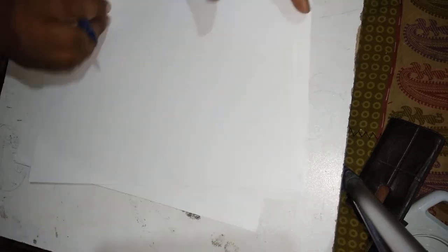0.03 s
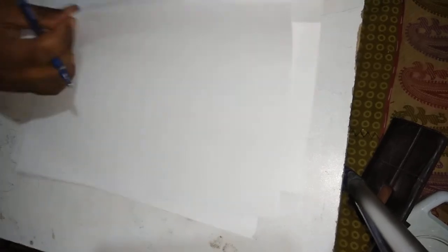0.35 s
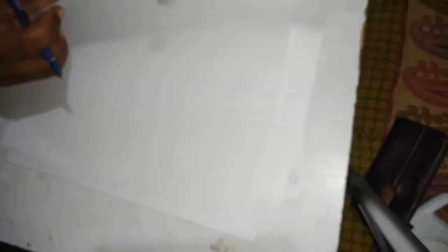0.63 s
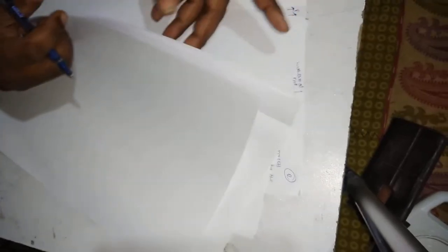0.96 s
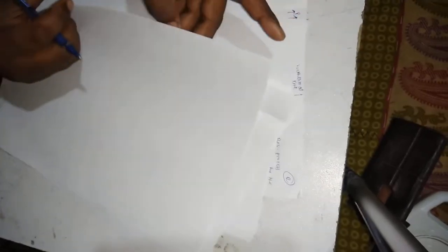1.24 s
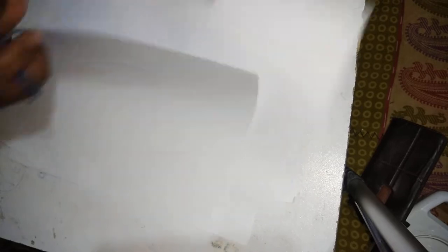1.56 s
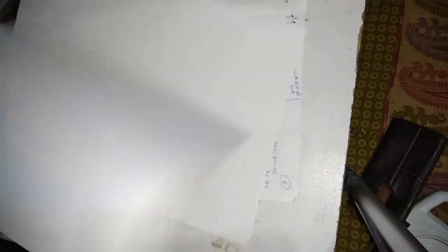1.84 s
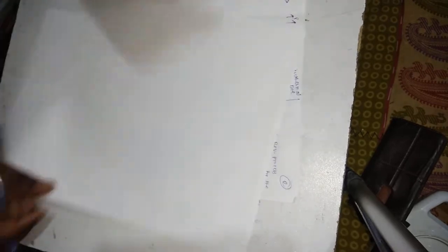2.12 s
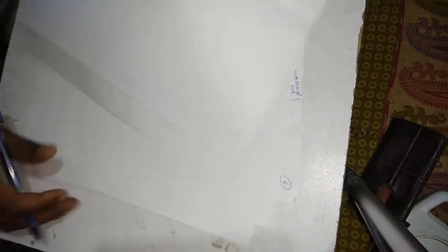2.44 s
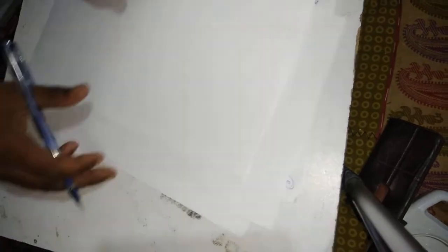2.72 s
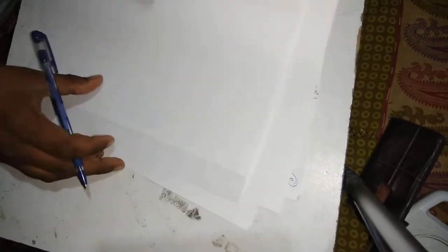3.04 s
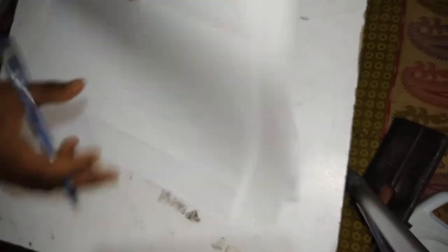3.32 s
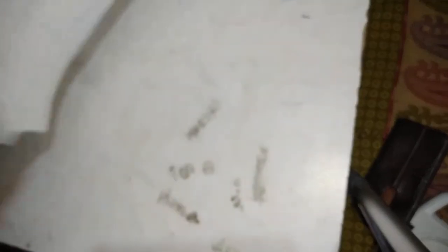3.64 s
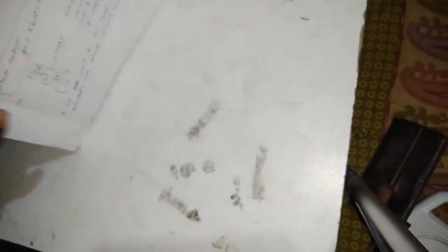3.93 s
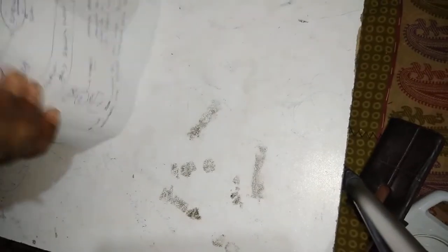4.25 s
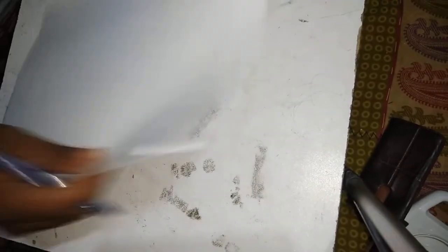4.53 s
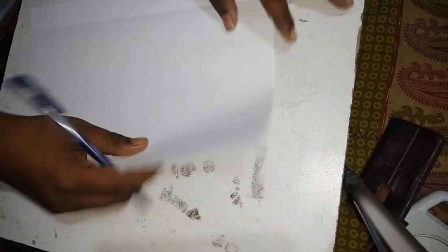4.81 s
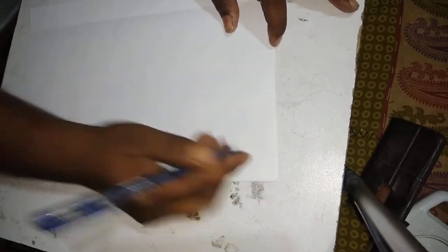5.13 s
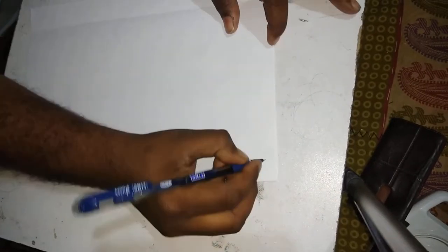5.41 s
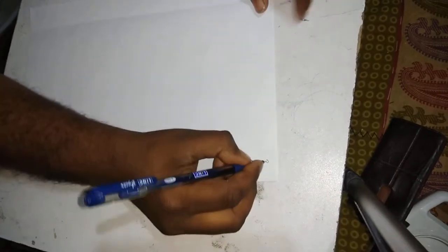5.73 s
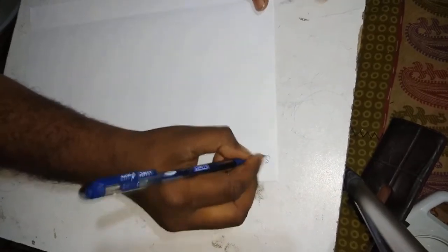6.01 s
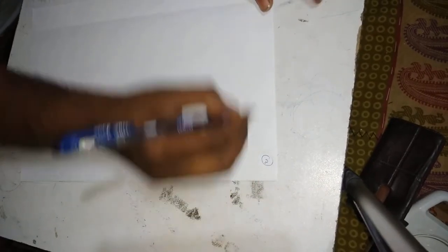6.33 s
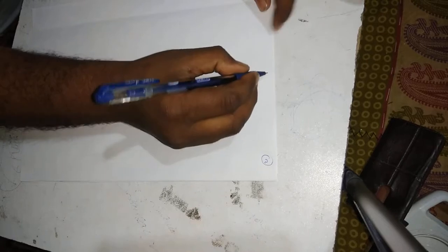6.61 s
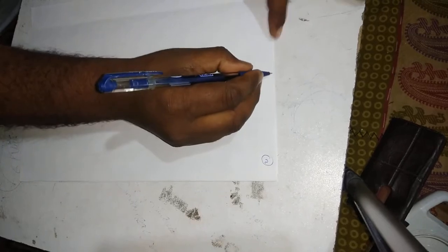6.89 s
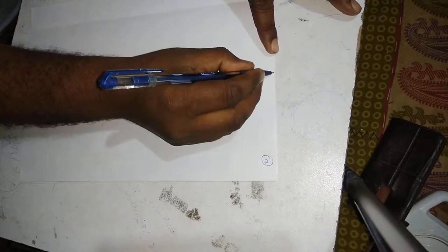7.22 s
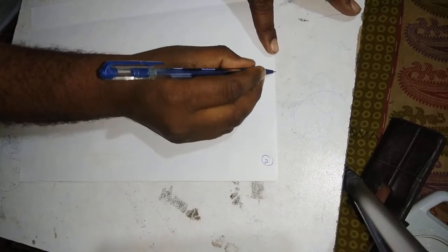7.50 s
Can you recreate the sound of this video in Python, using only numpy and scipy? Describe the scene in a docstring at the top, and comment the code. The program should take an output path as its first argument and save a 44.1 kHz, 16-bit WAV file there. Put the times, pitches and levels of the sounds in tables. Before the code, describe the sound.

Close paper hisses, snaps and slaps as pages are turned; something hard clatters on the desk, then a hand with a pen settles, ticking lightly.

```python
"""Sheets of paper slide, lift and turn over on a desk, close to a phone in a small quiet room.
Fibres catch and let go in a hiss and a lower rustle; sheets snap as they buckle and slap the stack.
Something hard clatters once and rings the desk, then a hand with a pen settles on the page among
light ringing ticks. Faint gliding tones come and go; a thin high whine hangs behind it all and fades."""
import sys
import numpy as np
from scipy import signal
from scipy.fft import rfft, irfft, next_fast_len
from scipy.io import wavfile
from scipy.ndimage import uniform_filter1d

SR = 44100
rng = np.random.default_rng(int(sys.argv[2]) if len(sys.argv) > 2 else 0)


def generate_wav(signal):
    """Clip the signal to [-1, 1] and save it as 16-bit WAV at the path in sys.argv[1]."""
    frames = np.transpose(np.atleast_2d(signal))
    scaled = np.clip(frames, -1, 1) * 32767
    pcm = np.round(scaled).astype(np.int16)
    wavfile.write(sys.argv[1], SR, pcm)


N = 342204
TIME = np.arange(N) / SR

# room tone: freq_hz, gain_db
AIR_EQ = [(30, -30.5), (100, -15.5), (200, -3), (420, 2.5), (700, -13), (1200, -8.5), (2500, -31),
          (15000, -41)]
# partials of the whine: pitch_hz, half_width_hz, level_db, fade_share
WHINE_TONES = [(3350, 14, -64, 0.51), (7744, 31, -53, 0.76), (11120, 26, -61.5, 1),
               (11320, 45, -63.5, 0.96), (12635, 24, -57.5, 0.96)]
# the whine dying away: time_s, gain_db
WHINE_FADE = [(0, 5), (.8, 1), (1.6, 1), (2.4, -5), (3.4, -11), (4.4, -9), (5.1, -13), (5.5, -15),
              (6.9, -14.5), (7.25, -23), (7.5, -41), (7.76, -43)]

# a sheet is pushed or lifted: start_s, length_s, hiss_db, sheen_offset_db, rustle_db
STROKES = [(0.104, 0.064, -47.5, 0.5, -56.5), (0.167, 0.15, -53, -6, -59.5), (0.344, 0.056, -45.5, -8, -62),
           (0.44, 0.22, -46.5, -4.5, -51), (0.551, 0.21, -48, 1, -45.5), (1.059, 0.081, -52.5, -5.5, -72),
           (1.24, 0.2, -49.5, -8.5, -55), (1.422, 0.078, -37.5, -2, -51.5), (1.525, 0.11, -47.5, 3, -47.5),
           (1.657, 0.16, -44, -4.5, -49), (1.78, 0.095, -40.5, -7.5, -42), (1.96, .28, -55, -3, -53.5),
           (2.269, 0.084, -39.5, -1.5, -39.5), (2.448, 0.31, -51, 0.5, -49.5),
           (2.606, 0.054, -45.5, 1.5, -68), (2.863, .06, -43, -5, -44.5), (2.942, 0.12, -42, -17.5, -37.5),
           (3.183, .14, -40, -13, -45), (3.423, 0.15, -49, -3, -48.5), (3.618, .035, -47, 7, -43),
           (3.722, 0.1, -49.5, 3, -61), (4.178, 0.064, -46.5, 3.5, -48.5), (4.25, 0.12, -50, 4, -54.5),
           (4.592, 0.052, -47.5, -7, -44), (4.67, 0.17, -63, -13, -53), (4.847, 0.027, -46, -2, -60),
           (5.147, 0.052, -67, 6, -86), (5.519, 0.078, -69, 6, -67), (5.619, 0.23, -59, 1, -56),
           (6.23, 0.048, -61, 2, -57.5), (6.06, 0.041, -83, 11, -82), (6.448, .08, -82.5, 13, -80),
           (6.648, 0.034, -73, 9, -72), (7.453, 0.028, -94.5, -2, -65), (7.635, 0.18, -63.5, -2, -65)]
# held sheets creep between strokes until they lie flat under the hand: time_s, level_db
CREEP = [(0, -58), (1.0, -61), (2.0, -58.5), (3.2, -50), (4.3, -57), (4.95, -61), (5.3, -89), (6.6, -88.5),
         (7.76, -95)]
# sliding hiss, its fine sheen and the rustle of bending: freq_hz, gain_db
HISS_EQ = [(700, -32), (2000, -0.5), (3800, 2), (5500, 0), (7000, 0), (9000, -10), (12000, -18.5),
           (15500, -30.5)]
SHEEN_EQ = [(3000, -33.5), (6000, -10), (8500, -0.5), (11000, -1.5), (13000, -5), (15500, -8.5)]
RUSTLE_EQ = [(200, -24.5), (500, -3), (900, 5), (1500, 1), (2500, -4.5), (4000, -18), (8000, -39.5)]

# hand and paper rub over the desk top: start_s, length_s, level_db
RUBS = [(0.534, 0.064, -48.5), (1.593, 0.076, -61), (1.814, 0.068, -44), (2.102, 0.013, -51),
        (2.424, 0.42, -53), (2.892, 0.031, -43.5), (3.34, 0.11, -58), (3.467, 0.22, -53.5),
        (4.17, .02, -43.5), (4.21, 0.15, -53), (4.52, 0.028, -52), (4.595, 0.12, -58), (4.78, 0.11, -55),
        (5.016, 0.15, -65), (5.526, 0.065, -61.5), (5.62, 0.25, -58.5), (6.021, 0.12, -57.5),
        (6.3, .06, -54), (6.616, 0.069, -56), (7.45, 0.098, -67.5), (7.636, 0.067, -63.5)]
# rubbing on the desk, and skin on the page: freq_hz, gain_db
RUB_EQ = [(30, -43.5), (70, -29.5), (130, -7), (220, 0), (400, -0.5), (600, -3), (1000, -20), (3000, -48.5)]
PALM_EQ = [(30, -30), (70, -39), (130, -1), (200, -1), (330, 1), (500, -6), (700, -23.5), (3000, -44)]
# the side of the hand takes over the rubbing: time_s, palm_share
PALM_CROSSFADE = [(4.5, 0.0048), (5.0, 1)]

# faint gliding tones: start_s, length_s, start_hz, end_hz, level_db, width_share
GLIDES = [(0.127, 0.23, 726, 604, -72, 0.14), (0.137, 0.36, 390, 337, -66.5, 0.15),
          (2.503, 0.35, 500, 412, -53, 0.34), (5.629, 0.14, 700, 559, -60.5, .5),
          (5.963, 0.035, 1593, 1655, -56.5, 0.14), (6.068, 0.17, 1190, 1060, -68.5, .4),
          (6.558, .056, 1755, 1655, -60.5, .25), (6.88, .22, 1150, 997, -74.5, 0.25),
          (7.042, .17, 464, 424.4, -66, 0.18), (7.029, 0.39, 4650, 4430, -86.5, 0.031),
          (7.178, 0.19, 423, 306, -72, 0.22), (7.583, 0.2, 1146, 1235, -74, .3)]

# a sheet slaps the stack (flaps) or buckles (snaps): start_s, level_db, treble_offset_db, decay_s
FLAPS = [(.152, -44, 5, 0.0089), (1.122, -51.5, -14, 0.0038), (1.252, -44.5, -7, 0.027),
         (1.601, -38, -10, 0.0056), (1.810, -28, -4, 0.013), (1.945, -28, -39, 0.012),
         (1.954, -34.5, -35, 0.025), (2.284, -35, -12, 0.033), (2.403, -38, -10, 0.0094),
         (2.902, -38.5, -5, 0.017), (2.983, -30.5, -6.5, 0.011), (3.218, -29, 7, .011),
         (3.340, -33, -24.5, 0.0057), (4.177, -39, -14, 0.0053), (4.528, -50, 3.5, 0.0059),
         (4.610, -32, -11.5, 0.0068)]
SNAPS = [(.2484, -42.5, -9, 0.0015), (.5420, -33, -16, 0.0021), (.5895, -34, 3, 0.0014),
         (.7014, -19.5, 2, 0.0016), (1.5075, -38, 23, 0.00041), (1.5170, -35, -10, .001),
         (1.7778, -26.5, -13, 0.0025), (1.8475, -36, 14.5, 0.0029), (2.1112, -39, -24, 0.0017),
         (2.8380, -41, 13.5, 0.0014), (2.9363, -31, -23, 0.0027), (3.0700, -39, -4, 0.00072),
         (3.1037, -27.5, -18, 0.0024), (3.1490, -30.5, 2.5, 0.0031), (3.1570, -26.5, 1.5, 0.0011),
         (3.2240, -22, -6.5, 0.0046), (3.4722, -42.5, 11, 0.0048), (3.5675, -41, 9.5, 0.0045),
         (3.6335, -36, 6, 0.0025), (4.2875, -32.5, -20, 0.00081), (4.6085, -30, -8, 0.0016)]
# their dull bodies and the bright edge they share: freq_hz, gain_db
FLAP_BODY_EQ = [(40, -42.5), (200, -17), (450, -8), (800, 3), (1500, 1.5), (2200, -4), (3500, -13.5),
                (7000, -29.5), (15000, -45)]
SNAP_BODY_EQ = [(40, -34.5), (200, -24.5), (500, -1.5), (1300, 3), (2200, -0.5), (3500, 0), (7000, -40.5),
                (15000, -40)]
PAPER_EDGE_EQ = [(800, -28.5), (2500, -10.5), (4000, 1), (7000, -2.5), (11000, -5.5), (15500, -14)]
# a sheet's edge skims across another: start_s, length_s, level_db
SKIMS = [(1.445, 0.039, -38), (2.282, 0.086, -38.5), (4.479, 0.032, -44.5), (4.526, 0.034, -42.5)]

# a hard thing lands and bounces: start_s, level_db, treble_offset_db, decay_s
BOUNCES = [(3.86, -30, 3, 0.0051), (3.872, -23.5, -5.5, 0.004), (3.881, -20, -9.5, 0.00067),
           (3.8843, -11.5, -6.5, 0.0042), (3.8947, -16, 0, 0.0048), (3.8977, -17.5, 3, 0.0015),
           (3.9098, -15.5, 7, 0.0026)]
# dull body and bright edge of each bounce: freq_hz, gain_db
BOUNCE_BODY_EQ = [(30, -28), (90, -24.5), (180, -12), (400, 9.5), (800, 4), (1500, -0.5), (3000, -8.5),
                  (8000, -26.5)]
BOUNCE_EDGE_EQ = [(800, -20.5), (2500, -1), (4500, 0.5), (8000, 1), (11500, -1), (15500, -11)]
# resonances of the desk: pitch_hz, level_db, t60_s
DESK_MODES = [(206.5, 0, 0.49), (276.7, -4.5, 0.28), (347.7, -9.5, 0.36), (427, 2.5, 0.25),
              (547, -10.5, .22), (597.4, -12.5, .25), (878, -7, 0.19), (1090, -4.5, 0.19),
              (1306, -7.5, 0.25), (1526, -4, 0.27)]

# light ticks: start_s, level_db, ring_offset_db
TICKS = [(4.8246, -21, -29), (5.0253, -22, -15.5), (5.3646, -31.5, -23.5), (5.4802, -36, -26),
         (5.5561, -34, -37), (5.6293, -32, -20.5), (6.2175, -24.5, -23.5), (6.5578, -41, -14.5),
         (6.6653, -38.5, -18.5), (7.46, -50, -30), (7.68, -39, -42)]
# the click of a tick: freq_hz, gain_db
TICK_EQ = [(40, -13), (150, 3.5), (500, -10), (1100, 5), (1700, 10.5), (2500, 6.5), (3300, -11),
           (8000, -65)]
# the thin ring it leaves: pitch_hz, level_db, t60_s
TICK_MODES = [(1615, -12, 0.37), (1640, 7, 0.14), (1705, -2, 0.1), (2340, -7, 0.18)]

# reverb time of the room: freq_hz, t60_s
ROOM_DECAY = [(100, 0.73), (400, .6), (1500, 0.58), (5000, 0.52), (14000, 0.39)]


def undb(db):
    """Decibels to gain."""
    return 10 ** (np.asarray(db) / 20)


def add(track, start_s, sound):
    """Mix a sound into a track from start_s on."""
    start = int(start_s * SR)
    track[..., start:start + sound.shape[-1]] += sound[..., :N - start]


def automation(points):
    """A fader curve through (time_s, value) points."""
    return np.interp(TIME, *np.transpose(points))


def pan(x, left_db):
    """Set the left channel left_db above the right."""
    return x * undb([[left_db / 2], [-left_db / 2]])


def eq(x, points, size=4096):
    """Minimum-phase EQ through (freq_hz, gain_db) points, scaled to keep the power of white noise."""
    hz, db = np.transpose(points)
    bins = np.maximum(np.fft.rfftfreq(size, 1 / SR), 1)
    gain = undb(np.interp(np.log(bins), np.log(hz), db))
    cepstrum = irfft(np.log(gain))
    cepstrum[1:size // 2] *= 2
    cepstrum[size // 2 + 1:] = 0
    response = irfft(np.exp(rfft(cepstrum)))
    return signal.fftconvolve(x, response[None] / np.linalg.norm(response), axes=1)[:, :x.shape[1]]


def noise(n, split_hz=950):
    """Noise at two microphone ports: centred in the bass, wide in the treble."""
    mid, side = rng.standard_normal((2, n))
    side = signal.sosfilt(signal.butter(1, split_hz, "high", fs=SR, output="sos"), side)
    return np.array([mid + side, mid - side])


def wander(rate_hz):
    """Smoothed sample-and-hold modulation with a spread near 1."""
    hold = int(SR / rate_hz)
    steps = np.repeat(rng.standard_normal(N // hold + 1), hold)
    return np.sqrt(2) * uniform_filter1d(uniform_filter1d(steps, hold), hold)[:N]


def modes(table):
    """One second of decaying resonances."""
    t = TIME[:SR]
    return sum(undb(db) * np.cos(2 * np.pi * hz * t) * np.exp(-np.log(1000) * t / t60)
               for hz, db, t60 in table)


def gestures(starts, lengths, levels_db, floor, attack_share=0.32, release_s=0.022, release_share=0.17):
    """Envelope of moves that gather speed, hold and die away to a floor; long ones stop more slowly."""
    power, t = np.zeros(N), TIME[:2 * SR]
    for start, length, db in zip(starts, lengths, levels_db):
        attack = np.sin(np.pi / 2 * np.minimum(t / (attack_share * length), 1))
        release = np.exp(-np.maximum(t - length, 0) / (release_s + release_share * length))
        add(power, start, (undb(db) * attack * release) ** 2)
    return np.sqrt(power + floor ** 2)


def friction(tone, slips_per_s, spread_db, grain_s, flutter_db):
    """Fibres catch and let go: a dense shower of tiny noise grains, in uneven waves."""
    slipping = rng.random(N) < slips_per_s / SR
    slips = slipping * undb(spread_db * np.minimum(rng.exponential(size=N), 2 * np.pi))
    power = signal.lfilter([1], [1, -np.exp(-1 / (grain_s * SR))], slips ** 2)
    grains = noise(N) * np.sqrt(power / power.mean())
    return eq(grains, tone) * undb(flutter_db * wander(35))


def hits(table, body_eq, edge_eq, attack_share):
    """Noise bursts with a dull body and a bright edge; the attack is a share of the decay."""
    body, edge = np.zeros((2, 2, N))
    t = TIME[:SR // 4]
    for start, db, treble_db, decay in table:
        envelope = np.exp(-t / decay) * (1 - np.exp(-t / (attack_share * decay)))
        envelope *= undb(db) / envelope.max()
        add(body, start, envelope * noise(len(t)))
        add(edge, start, envelope * noise(len(t)) * undb(treble_db))
    return eq(body, body_eq) + eq(edge, edge_eq)


def room_tone():
    """A faint, low bed of air whose level wavers."""
    return undb(-86.5 + 2.9 * wander(15)) * eq(noise(N), AIR_EQ)


def whine():
    """Narrow bands of noise sing as wavering high tones, each following the fade by its own share."""
    size = next_fast_len(N)
    bins, fade_db = np.fft.rfftfreq(size, 1 / SR), automation(WHINE_FADE)
    spectrum, out = rfft(noise(size)), np.zeros((2, N))
    for hz, half_width, db, fade_share in WHINE_TONES:
        tone = irfft(spectrum / (1 + ((bins - hz) / half_width) ** 2), size)[:, :N]
        out += tone / tone.mean(axis=0).std() * undb(db + fade_share * fade_db)
    return out


def sliding_sheets():
    """Paper slides on paper: a hiss and a finer sheen above it, as two layers."""
    starts, lengths, hiss_db, sheen_offset_db, _ = np.transpose(STROKES)
    creep = undb(automation(CREEP))
    hiss = friction(HISS_EQ, slips_per_s=3000, spread_db=0, grain_s=0.0017, flutter_db=2.5)
    sheen = friction(SHEEN_EQ, slips_per_s=3700, spread_db=0.5, grain_s=0.0006, flutter_db=2.4)
    hiss *= gestures(starts, lengths, hiss_db, creep)
    sheen *= gestures(starts, lengths, hiss_db + sheen_offset_db, creep)
    return undb(-3.5) * hiss, undb(1) * sheen


def bending_sheets(creep_offset_db=-10):
    """A flexing sheet rustles in lower, coarser grains; returns the rustle and the bend envelope."""
    starts, lengths, _, _, rustle_db = np.transpose(STROKES)
    bend = gestures(starts, lengths, rustle_db, undb(automation(CREEP) + creep_offset_db))
    rustle = friction(RUSTLE_EQ, slips_per_s=490, spread_db=1.5, grain_s=0.0025, flutter_db=2.0)
    return undb(-4.5) * rustle * bend, bend


def rubbing(bend):
    """Soft surfaces slide without separate slips: first on the desk top, then skin on the page."""
    palm = np.clip(automation(PALM_CROSSFADE), 0, 1)
    floor = bend * undb(-13) + palm * undb(-79.5)  # bending sheets rub too; the hand is never quite still
    pressure = gestures(*np.transpose(RUBS), floor)
    contact = noise(N) * pressure * undb(-1 + 2.2 * wander(35))
    return eq(contact * (1 - palm), RUB_EQ) + eq(contact * palm, PALM_EQ)


def desk_reflection(x, gain, delay_s=0.0007, sway=0.45):
    """The desk reflects a moving sheet with a wandering delay, different in each channel."""
    late = [np.interp(TIME - delay_s * np.exp(sway * wander(7)), TIME, channel) for channel in x]
    return (x + gain * np.array(late)) / np.hypot(1, gain)


def gliding_tones():
    """Faint gliding tones: narrow bands of noise sliding from one pitch to another."""
    out = np.zeros((2, N))
    for start, length, start_hz, end_hz, db, width_share in GLIDES:
        n = int(length * SR)
        lowpass = signal.butter(3, width_share * start_hz / 2, fs=SR, output="sos")
        band = signal.sosfilt(lowpass, noise(SR) + 1j * noise(SR))[:, -n:]
        glide = np.exp(2j * np.pi * np.cumsum(np.linspace(start_hz, end_hz, n)) / SR)
        tone = (band * glide).real
        add(out, start, undb(db) * signal.windows.tukey(n, 0.5) * tone / tone.std())
    return out


def flaps():
    """A sheet swings over and slaps the stack."""
    return undb(-4) * hits(FLAPS, FLAP_BODY_EQ, PAPER_EDGE_EQ, attack_share=0.3)


def snaps():
    """A sheet buckles with a short, crisp snap."""
    return undb(-2) * hits(SNAPS, SNAP_BODY_EQ, PAPER_EDGE_EQ, attack_share=0.25)


def skims():
    """One sheet's edge skims another: a bright, fine hiss that starts and stops abruptly."""
    gate = np.zeros(N)
    for start, length, db in SKIMS:
        add(gate, start, undb(db) * signal.windows.tukey(int(length * SR), 0.2))
    return gate * friction(SHEEN_EQ, slips_per_s=9000, spread_db=1.6, grain_s=0.0008, flutter_db=0.8)


def clatter(desk_offset_db=-21):
    """Something hard lands in a quick run of bounces, each of which rings the desk."""
    desk, ring = np.zeros(N), modes(DESK_MODES)
    for start, db, _, _ in BOUNCES:
        add(desk, start, undb(db + desk_offset_db) * ring)
    return hits(BOUNCES, BOUNCE_BODY_EQ, BOUNCE_EDGE_EQ, attack_share=0.14) + desk


def ticks(click_db=3, buzz_db=-21, buzz_s=0.011, swell_s=0.0089, left_lag_s=0.00008, detune=0.0026):
    """Two layers: buzzy clicks that arrive on the right first, and a thin ring swelling after each."""
    clicks, rings, t = np.zeros((2, N)), np.zeros(N), TIME[:SR]
    for start, db, ring_db in TICKS:
        impulse = undb([db + click_db])
        add(clicks[0], start + left_lag_s, impulse)
        add(clicks[1], start, impulse)
        add(clicks, start, undb(db + buzz_db) * np.exp(-t / buzz_s) * noise(SR))
        # detuned, the close modes beat anew on every tick
        ring = modes([(hz * (1 + detune * rng.normal()), level, t60) for hz, level, t60 in TICK_MODES])
        add(rings, start, undb(db + ring_db) * ring * (1 - np.exp(-t / swell_s)))
    return eq(clicks, TICK_EQ), rings


def reverb(send, onset_s=0.0022, bands=9):
    """Diffuse echo of the walls, dying sooner in the treble."""
    hz, t60 = np.transpose(ROOM_DECAY)
    log_bins = np.log(np.maximum(np.fft.rfftfreq(SR, 1 / SR), 1))
    centres = np.linspace(np.log(hz[0]), np.log(hz[-1]), bands)
    spectrum, tail, t = rfft(noise(SR)), np.zeros((2, SR)), TIME[:SR]
    for band_t60, weights in zip(np.interp(centres, np.log(hz), t60), np.eye(bands)):
        band = irfft(spectrum * np.interp(log_bins, centres, weights))
        tail += band * np.exp(-np.log(1000) * t / band_t60)
    tail *= 1 - np.exp(-(t / onset_s) ** 2)
    return signal.fftconvolve(send, tail / np.linalg.norm(tail.mean(axis=0)), axes=1)[:, :N]


def scene():
    """Close paper, the clatter and the ticks share one reverb over a bed of room tone and whine."""
    hiss, sheen = sliding_sheets()
    rustle, bend = bending_sheets()
    paper = pan(rubbing(bend), left_db=-3.5)
    paper += desk_reflection(hiss + rustle, gain=1.0)
    paper += pan(desk_reflection(sheen + skims(), gain=0.88), left_db=1.5)
    close = paper + gliding_tones() + snaps() + flaps()
    knocks = clatter()
    clicks, rings = ticks()
    send = undb(-12) * close + undb(-7.5) * knocks + undb(-11) * clicks + undb(-8.5) * rings
    return close + knocks + clicks + rings + reverb(send) + room_tone() + whine()


def record(dry, low_cut_hz=65, high_cut_hz=15700):
    """The phone thins the deepest bass, clips any peak over full scale and cuts the top."""
    low_cut = signal.butter(2, low_cut_hz, "high", fs=SR, output="sos")
    high_cut = signal.ellip(10, 0.2, 70, high_cut_hz, fs=SR, output="sos")
    clipped = np.clip(signal.sosfilt(low_cut, dry), -1, 1)
    return signal.sosfilt(high_cut, clipped)


dry = scene()
out = record(dry)
generate_wav(out)
```